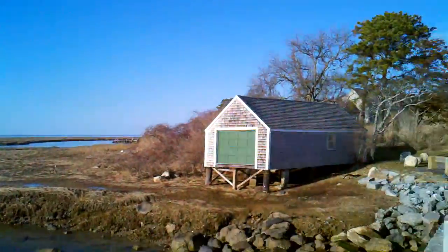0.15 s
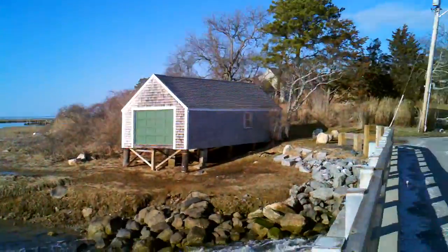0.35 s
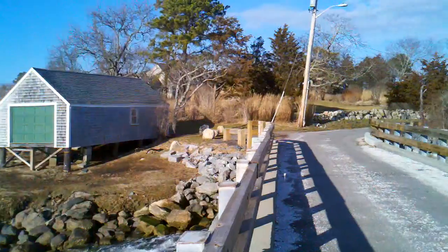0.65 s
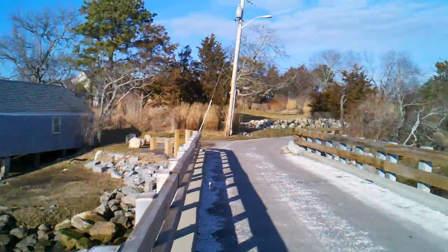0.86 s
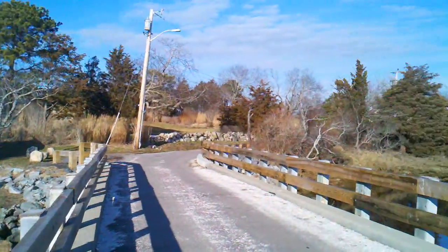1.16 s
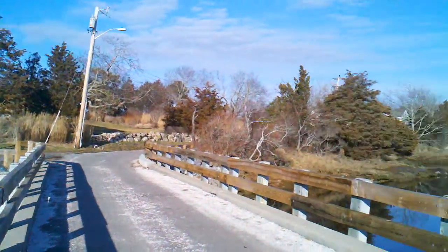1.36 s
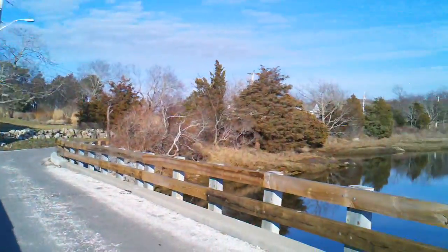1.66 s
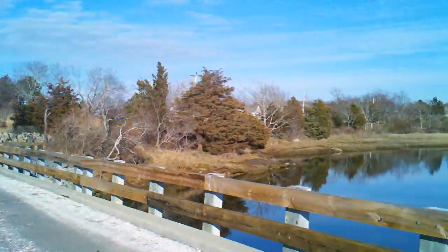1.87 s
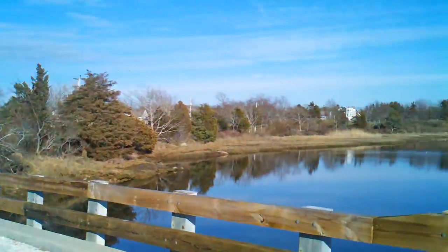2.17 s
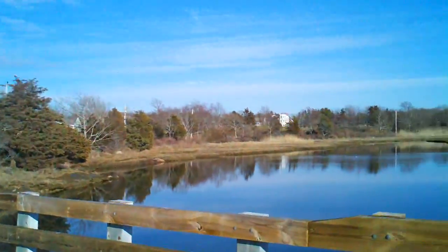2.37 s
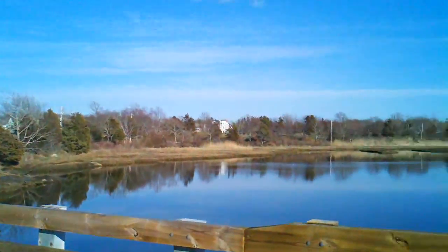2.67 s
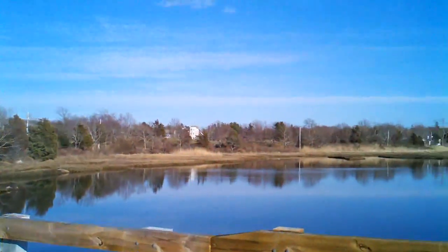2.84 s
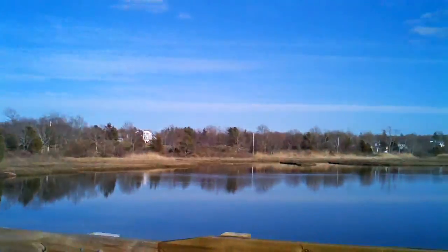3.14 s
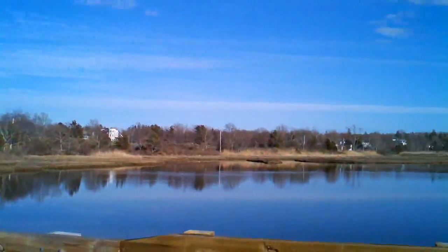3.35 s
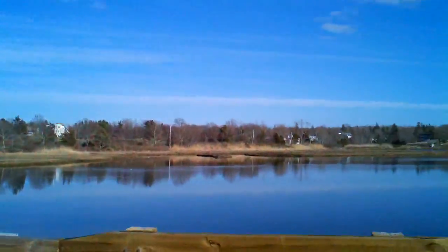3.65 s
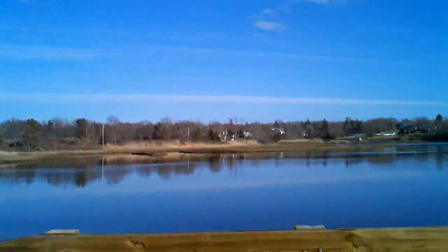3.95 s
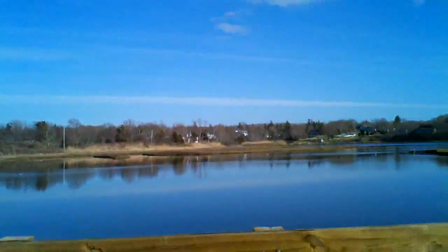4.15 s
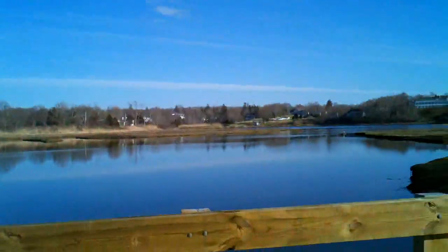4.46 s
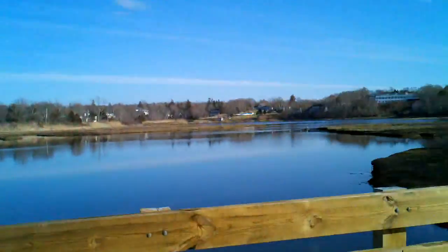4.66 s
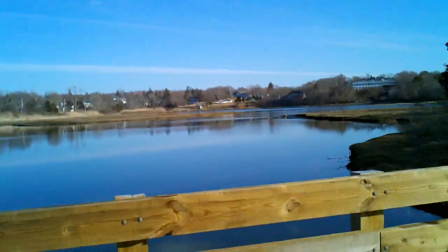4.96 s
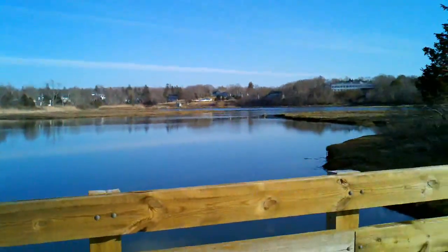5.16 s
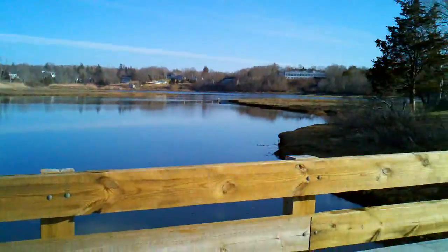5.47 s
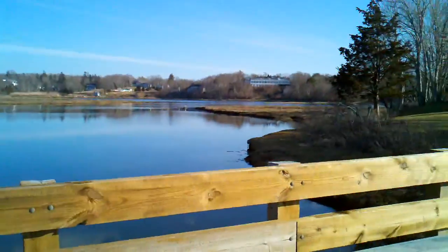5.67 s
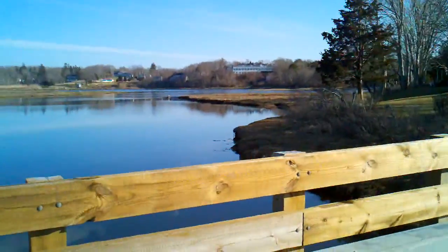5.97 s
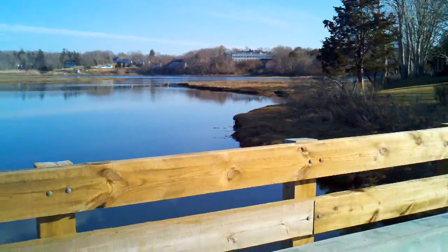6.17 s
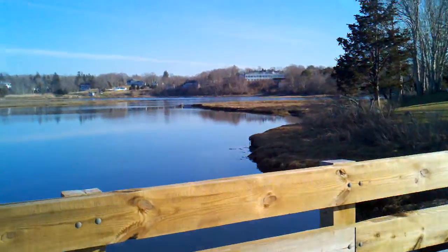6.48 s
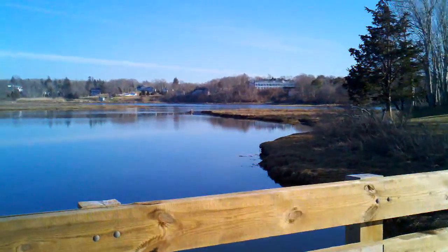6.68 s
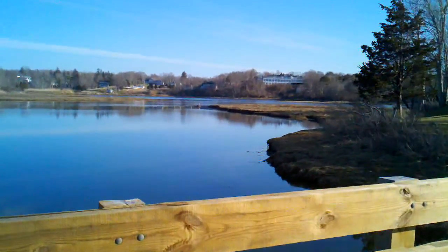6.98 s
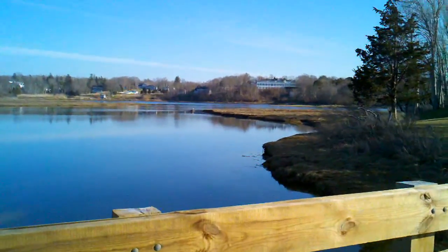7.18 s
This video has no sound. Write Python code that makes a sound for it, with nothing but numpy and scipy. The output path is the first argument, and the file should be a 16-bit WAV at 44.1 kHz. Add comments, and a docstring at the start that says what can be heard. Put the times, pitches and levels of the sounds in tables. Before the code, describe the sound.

A steady rush of gurgling, splashing creek water slowly loses its bright spray and weakens, with a few handling clicks and rubs near the end.

```python
"""Tidal water rushes through a rocky channel under a bridge, heard from the deck on a hand-held phone.
From the start bubbles merge into a roar with fizzing spray; near ones gurgle, heaves free bubble clouds.
Short low swells, most of them gulping air pockets, come from 0.66 s on; from 1.2 s fingers tick and rub
on the case, most densely near the end. Meanwhile the phone swings away from the channel, fast at first,
and the roar and spray fade. Stereo is widened by subtracting from each port the delayed other."""
import sys
import numpy as np
from scipy import signal
from scipy.fft import rfft, irfft, next_fast_len
from scipy.io import wavfile
from scipy.ndimage import map_coordinates

SR = 44100
rng = np.random.default_rng(int(sys.argv[2]) if len(sys.argv) > 2 else 0)


def store_wav(level_fs):
    """Save 16-bit WAV to argv[1]."""
    pcm = np.round(np.clip(np.atleast_2d(level_fs), -1, 1) * 32767)
    wavfile.write(sys.argv[1], SR, pcm.T.astype(np.int16))


N = 322812
TIME = np.arange(N) / SR
PADDED = next_fast_len(N + 8192)
HZ = np.maximum(np.arange(PADDED // 2 + 1) * SR / PADDED, 1)


def from_db(db):
    """Decibels to gain."""
    return 10 ** (np.asarray(db) / 20)


def rms_one(x):
    """Scale to rms 1."""
    return x / np.sqrt(np.mean(x ** 2) + 1e-20)


def in_time(rows):
    """One curve per column, joined by straight lines."""
    s, *columns = np.transpose(rows)
    return [np.interp(TIME, s, column) for column in columns]


def over_hz(points):
    """A table read along a log-frequency axis."""
    hz, values = np.transpose(points)
    return np.interp(np.log(HZ), np.log(hz), values)


def filtered(x, response):
    """Apply a frequency response."""
    return irfft(rfft(x, PADDED) * response, PADDED)[..., :N]


def butter(x, order, cut_hz, kind="low"):
    """Apply a Butterworth filter."""
    return signal.sosfilt(signal.butter(order, cut_hz, kind, fs=SR, output="sos"), x)


def delayed(x, delay_ms):
    """Read a sound late by a changing delay."""
    return map_coordinates(x, [np.arange(N) - delay_ms * SR / 1000], order=3)


def drift(rate_hz):
    """Smooth chance with spread 1 that changes about rate_hz times a second."""
    r = np.exp(-80 * np.pi * rate_hz / SR)
    noise = rng.standard_normal(N // 40 + 2002)
    slow = signal.lfilter([1], [1, -2 * r, r * r], noise)[2000:]
    return np.interp(np.arange(N) / 40, np.arange(len(slow)), rms_one(slow))


def stroke(start_s, length_s):
    """A smooth rise and fall, 0-1."""
    return np.sin(np.pi * np.clip((TIME - start_s) / length_s, 0, 1))


def ring(drive, pitch_hz, t60_s):
    """A damped two-pole mode: a unit click sets a sine of height 1 ringing."""
    r = from_db(-60 / (t60_s * SR))
    w = 2 * np.pi * pitch_hz / SR
    return signal.lfilter([0, np.sin(w)], [1, -2 * r * np.cos(w), r * r], drive + 1e-18)


def chirp(age_s, pitch_hz, rise_per_s):
    """A sine whose pitch climbs by a fixed fraction of pitch_hz a second."""
    return np.sin(2 * np.pi * pitch_hz * age_s * (1 + rise_per_s * age_s / 2))


def resonant_noise(pitch_hz, width_hz):
    """Noise in one steep-sided resonance; rms 1."""
    response = 1 / (1 + ((HZ - pitch_hz ** 2 / HZ) / width_hz) ** 2)
    return rms_one(filtered(rng.standard_normal(N), response))


# turn of the phone: time_s, bearing_deg
TURN = [(0, 27.5), (1, 67.4), (2.3, 122), (3, 130), (4, 145), (5, 149.8), (6.1, 159), (7.3, 158)]


def bearing():
    """Angle between the phone's line of sight and the channel, in radians."""
    return np.radians(in_time(TURN)[0])


def facing():
    """How squarely the phone faces the channel, 0-1."""
    return ((1 + np.cos(bearing())) / 2) ** 2


# rushing water, used relative to its mean: time_s, level_db
RUSH_LEVEL = [(0.05, -26), (1.19, -26), (3.33, -26), (6.16, -28.5), (7.09, -33), (7.15, -33)]
# treble, which the deck shades sooner, used relative to its mean: time_s, level_db
SPRAY_LEVEL = [(0.05, -35.5), (0.5, -35.5), (1.0, -34.5), (1.7, -35.5), (2.2, -36), (2.65, -37),
               (2.95, -35.5), (4.06, -37.5), (4.62, -41.5), (5.1, -43.5), (5.6, -44.5), (6.1, -48.5),
               (6.4, -48.5), (6.7, -47.5), (7.3, -45.5)]
# bursts of spray: start_s, length_s, rise_db
SPLASHES = [(0.16, 0.12, 1.5), (0.84, 0.06, 1), (2.81, 0.13, 1), (3.11, 0.093, 1.5), (4.07, 0.07, 1.8),
            (4.35, 0.1, 0.5), (5.14, 0.08, 0)]


def zone_levels(roar_db=-1.5, gurgle_db=-0.7, splash_db=-1.8, spray_db=-1.76,
                facing_roar_db=-1.9, facing_gurgle_db=-6.0, facing_splash_db=4.5,
                roar_follows=0.61, gurgle_follows=1.2, splash_follows=1.38):
    """Zone levels in dB; facing the channel brings more splash and less of the low churning."""
    (rush,), (treble,) = in_time(RUSH_LEVEL), in_time(SPRAY_LEVEL)
    rush, treble = rush - rush.mean(), treble - treble.mean()
    front = facing()
    bursts = sum(db * stroke(s, length) for s, length, db in SPLASHES)
    return (roar_db + roar_follows * rush + facing_roar_db * front,
            gurgle_db + gurgle_follows * rush + facing_gurgle_db * front,
            splash_db + splash_follows * rush + facing_splash_db * front,
            spray_db + treble + bursts)


def bubbles(per_s, cycles, spread_db, count=64):
    """Bubbles of all sizes ring for some cycles each, small ones more often; even power per Hz."""
    out = np.zeros(N)
    for hz in np.geomspace(120, 15000, count):
        births = int(per_s * (.5 + hz / 1000) * N / SR)
        when, size, sign = rng.random((births, 3)).T
        sizes = from_db(spread_db * np.minimum(-np.log(size), 4)) * np.sign(sign - .5)
        clicks = np.bincount((when * N).astype(int), sizes, N)
        out += np.sqrt(hz) * rms_one(ring(clicks, hz, cycles / hz))
    return rms_one(out)


# colour of the water before zone levels: pitch_hz, density_db (per Hz)
WATER = [(110, -73.5), (155, -67), (250, -57.5), (420, -53), (700, -55.5), (1250, -61.5), (1900, -61.5),
         (2900, -67.5), (3750, -71.5), (4500, -76), (5200, -79), (6500, -73), (9000, -72.5), (11500, -78.5),
         (14000, -80)]


def white_water(bubble_share=0.61, surge_db=1.03, spatter_db=1.1):
    """One stretch of rapids: near bubbles over the blur of far ones, surging in four zones of pitch."""
    share = np.clip(bubble_share, 0, 1)
    near = bubbles(per_s=70, cycles=30.2, spread_db=2.5)
    far = rng.standard_normal(N)
    churn = np.sqrt(share) * near + np.sqrt(1 - share) * far
    colour = from_db(over_hz(WATER)) * np.sqrt(SR / 2) * np.minimum(HZ / WATER[0][0], 1) ** 5
    roar = over_hz([(430, 0.75), (620, 0.017)])
    up_to_gurgle = over_hz([(820, 0.77), (1100, 0.052)])
    spray = over_hz([(2000, 0.17), (3200, 0.86)])
    roar_db, gurgle_db, splash_db, spray_db = zone_levels()
    zones = [(roar, roar_db + surge_db * drift(4.3)),
             (up_to_gurgle - roar, gurgle_db + surge_db * drift(17)),
             (1 - up_to_gurgle - spray, splash_db + surge_db * drift(8.3)),
             (spray, spray_db + spatter_db * drift(14.6))]
    return sum(filtered(churn, colour * zone) * from_db(db) for zone, db in zones)


# heaves of the water: start_s, length_s, level_db, pitch_hz, spread_hz
SURGES = [(0.0, 0.2, -30, 1110, 130), (0.204, 0.13, -30, 700, 150), (0.41, 0.098, -31, 640, 110),
          (0.528, 0.1, -32.5, 700, 70), (1.2, 0.13, -32.5, 250, 70), (1.5, 0.24, -28, 780, 151),
          (1.997, 0.057, -22, 920, 201), (2.18, 0.18, -27.5, 385, 70.5), (2.873, 0.097, -30, 523, 90),
          (3.19, 0.062, -25.5, 410, 90), (4.28, 0.071, -32, 1080, 90), (5.038, 0.059, -32, 980, 150)]


def surges():
    """A heave of water frees a cloud of bubbles of about one size: a swell of resonant noise."""
    out = np.zeros(N)
    for start_s, length_s, level_db, pitch_hz, spread_hz in SURGES:
        out += from_db(level_db) * stroke(start_s, length_s) * resonant_noise(pitch_hz, spread_hz)
    return out


def gurgles(per_s=22, low_hz=330, high_hz=1700, size_db=-31, spread_db=2.5, cycles=8.7, rise_per_s=6.93):
    """Single bubbles close by: each swells, rings for some cycles and chirps upward."""
    out = np.zeros(N + SR)
    age_s = np.arange(SR // 8) / SR
    for when, pitch, size in rng.random((int(per_s * N / SR), 3)):
        hz = low_hz * (high_hz / low_hz) ** pitch
        start = int(when * N)
        life = age_s * hz / cycles
        gain = from_db(size_db + spread_db * min(-np.log(size), 3))
        swell = 2 * (np.exp(-life) - np.exp(-5 * life))
        out[start:start + len(age_s)] += gain * swell * chirp(age_s, hz, rise_per_s)
    return out[:N] * from_db(zone_levels()[1])


def hollow(pitch_hz=643, width_hz=270, facing_db=-29):
    """The hollow between the rocks rings with the roar, heard when facing it."""
    return from_db(facing_db) * np.sqrt(facing()) * resonant_noise(pitch_hz, width_hz)


# bright band of the rush: time_s, pitch_hz, level_db
BRIGHT_BAND = [(0, 1900, -42), (0.45, 1938, -39), (1.15, 2157, -29.5), (1.5, 1860, -42), (1.95, 1597, -38),
               (2.7, 1553, -48), (3.2, 1550, -75)]


def bright_band(width_hz=210, left_db=-10):
    """Low noise shifted up to a gliding pitch: a narrow band of the rush, mostly at the right port."""
    hz, level_db = in_time(BRIGHT_BAND)
    phase = 2 * np.pi * np.cumsum(hz) / SR
    a, b = filtered(rng.standard_normal((2, N)), 1 / (1 + (HZ / width_hz) ** 4))
    band = rms_one(a * np.cos(phase) + b * np.sin(phase))
    return from_db(level_db) * band * from_db([[left_db], [0]])


def paths(side_on_lead_ms=0.41, clearest_share=0.83, clearest_deg=107, opening_deg=79,
          bounce_ms=0.93, bounce_swing_ms=0.48):
    """The turn sets the left port's lead (ms), the straight share (0-1) and the bounce delay (ms)."""
    angle = bearing()
    share = clearest_share * np.exp(-((np.degrees(angle) - clearest_deg) / opening_deg) ** 2)
    return side_on_lead_ms * np.sin(angle), share, bounce_ms + bounce_swing_ms * np.cos(angle)


def railing_bounce(ports, delay_ms, bounce=0.023, facing_bounce=0.22, cut_hz=1300):
    """A dulled echo off the railing; a dip in the roar glides up as its delay shortens."""
    echo = butter(ports, 1, cut_hz)
    return (bounce + facing_bounce * facing()) * np.array([delayed(side, delay_ms) for side in echo])


# the deck lets little treble come straight: pitch_hz, weight (0-1)
STRAIGHT = [(80, 0.1), (160, 0.87), (400, 0.96), (750, 0.98), (1300, 0.89), (2000, 0.7), (3500, 0.85),
            (6000, 0.12), (13000, 0)]
# scattered sound is alike at both ports only in the bass: pitch_hz, correlation
LIKENESS = [(250, 1), (550, 0.98), (900, 1), (1400, 0.0)]


def channel():
    """Water comes straight from the channel, scattered by the rocks from all round, and off the railing."""
    lead_ms, share, bounce_ms = paths()
    share = np.clip(share, 0, .95)
    weight = np.clip(over_hz(STRAIGHT), 0, 1)
    near = filtered(white_water(), np.sqrt(weight)) * np.sqrt(share) + surges() + gurgles()
    alike = np.clip(over_hz(LIKENESS), -1, 1)
    common = filtered(white_water(), np.sqrt((1 + alike) / 2))
    opposed = filtered(white_water(), np.sqrt((1 - alike) / 2))
    around = common + opposed * [[1], [-1]]
    around = around - filtered(around, weight) * (1 - np.sqrt(1 - share))
    ports = np.array([near, delayed(near, lead_ms)]) + around + hollow() + bright_band()
    return ports + railing_bounce(ports, bounce_ms)


# the microphones' own noise: pitch_hz, gain_db
RUMBLE = [(25, -59), (60, -47), (120, -39.5), (400, -65)]


def rumble():
    """The microphones' own faint low noise, independent at each port."""
    return filtered(rng.standard_normal((2, N)), from_db(over_hz(RUMBLE)))


# short swells; those at 2.25 and 2.305 s are churning water, the others air pockets:
# start_s, level_db, pitch_hz (at the start)
SHORT_SWELLS = [(0.66, -23, 203), (0.797, -27, 332), (1.14, -25, 776), (1.57, -26, 352), (2.02, -21, 340),
                (2.25, -24.5, 334), (2.305, -23.5, 375), (4.022, -26, 772), (5.68, -26, 790),
                (6.013, -20, 252), (6.29, -25, 580)]


def short_swells(swell_s=0.0094, rise_per_s=5.1):
    """Short low swells of the water: each is a sine that rises fast, dies away and climbs a little in pitch."""
    out = np.zeros(N)
    for start_s, level_db, pitch_hz in SHORT_SWELLS:
        age_s = np.maximum(TIME - start_s, 0)
        swell = (age_s / swell_s * np.exp(1 - age_s / swell_s)) ** 2
        out += from_db(level_db) * swell * chirp(age_s, pitch_hz, rise_per_s)
    return np.array([out, out])


UPPER_RING_HZ, TOP_RING_HZ = 3560, 7800   # a fingernail wakes the top ring
HELD_T60_S = 0.003   # where a finger presses on the case
# ticks of the case, before case filters and port gains; upper and top relative to level_db, t60_s longer
# where the fingers damp it less: start_s, level_db, pitch_hz, upper_db, top_db, t60_s
TICKS = [(1.2344, -5.5, 1610, -33, -35, 0.0051), (2.3727, -0.2, 1520, -42, -40, 0.0043),
         (4.8283, -6, 1500, -32, -35, 0.004), (4.858, -17, 1700, -28, -35, 0.006),
         (6.4415, -15, 1400, -24, -30, 0.008), (6.447, -17.5, 1500, -24, -30, 0.008),
         (6.492, -12, 1400, -24, -30, 0.006), (6.6077, -10, 1300, -15, -24, 0.0047),
         (6.6503, -16, 1640, -29, -30, 0.006), (6.875, -14.5, 1650, -23, -30, 0.0074),
         (7.0355, -22, 2150, -18, -4, 0.008), (7.086, -16.5, 2140, -16, -7, 0.01),
         (7.192, -18, 1700, -3, -15, 0.006), (7.208, -19, 1300, -22, -30, 0.008),
         (7.2134, -9.5, 1420, -23, -25, 0.0079), (7.222, -9.3, 1810, -15, -18, 0.0047),
         (7.263, -18, 1800, -3, -15, 0.006)]


def ticks(body_hz=930, body_db=-13):
    """Clicks ring the dead modes of the case over a low knock; returns the rings and the top ring."""
    rings, top = np.zeros((2, N))
    for start_s, level_db, pitch_hz, upper_db, top_db, t60_s in TICKS:
        click = np.zeros(N)
        click[round(start_s * SR)] = from_db(level_db)
        rings += ring(click, pitch_hz, t60_s) + from_db(upper_db) * ring(click, UPPER_RING_HZ, t60_s)
        rings -= from_db(body_db) * ring(click, body_hz, HELD_T60_S)
        top += from_db(top_db) * ring(click, TOP_RING_HZ, t60_s / 2)
    return rings, top


# fingers sliding, before case filters and port gains; upper_db relative to ring_db:
# start_s, length_s, ring_db, upper_db, hiss_db
RUBS = [(1.215, 0.05, -33, -18, -55), (4.8, 0.13, -32, -16, -50), (5.69, 0.18, -41, -3, -39),
        (5.825, 0.03, -47, -6, -39), (6.426, 0.042, -33, -18, -58), (6.478, 0.053, -38, -18, -40),
        (6.56, 0.14, -41, -14, -47), (7.171, 0.13, -34.5, -9, -38.5)]


def rubs(rub_hz=1500, slips_per_s=1500, slip_spread_db=3.0):
    """Dense uneven slips ring the case while sliding skin hisses; returns the rings and the hiss."""
    rings, hiss = np.zeros((2, N))
    slips = (rng.random(N) < slips_per_s / SR) * rng.choice([-1, 1], N)
    slips = slips * from_db(slip_spread_db * np.minimum(rng.exponential(1, N), 4))
    main = rms_one(ring(slips, rub_hz, HELD_T60_S))
    upper = rms_one(ring(slips, UPPER_RING_HZ, HELD_T60_S))
    skin = rng.standard_normal(N)
    for start_s, length_s, ring_db, upper_db, hiss_db in RUBS:
        slide = stroke(start_s, length_s)
        rings += from_db(ring_db) * slide * (main + from_db(upper_db) * upper)
        hiss += from_db(hiss_db) * slide * skin
    return rings, hiss


def fingers(fingertip_cut_hz=4800, hiss_cut_hz=9500):
    """Ticks and rubs on the case beside the right port; soft fingertips dull the rings."""
    (tick_rings, top), (rub_rings, hiss) = ticks(), rubs()
    out = butter(tick_rings + rub_rings, 4, fingertip_cut_hz) + butter(top + hiss, 2, hiss_cut_hz)
    out = butter(out, 2, 600, "high")   # a small case gives no bass
    return out * [[.2], [1.4]]


# the ports' unequal colour: pitch_hz, right_over_left_db
PORT_MISMATCH = [(300, -1.5), (1200, -4.5), (1850, 3.5), (2600, -2), (3300, -5), (4200, 0.5)]


def scene():
    """Water through the unequal ports, plus fingers and rumble."""
    mismatch = from_db(over_hz(PORT_MISMATCH) * np.array([[-.5], [.5]]))
    mismatch = mismatch / np.sqrt(np.mean(mismatch ** 2, axis=0))
    return filtered(channel() + short_swells(), mismatch) + fingers() + rumble()


PORT_GAP_S, CUTOFF_HZ = .000383, 13980
# a hollow in the centre near 2.6 kHz, narrow early, wide later
NOTCH_HZ, NOTCH_EARLY_WIDTH_HZ, NOTCH_LATE_WIDTH_HZ = 2612, 100, 393
# widening: pitch_hz, subtracted_share of the other port
CROSSFEED = [(30, 0.82), (140, 0.76), (500, 0.83), (950, 1), (4100, 1), (4700, 0.18), (13000, 0.14)]


def record(dry):
    """Each side loses the delayed other, the centre is notched; lost bass is made up, the top is cut."""
    cross = np.clip(over_hz(CROSSFEED), 0, 1)
    turn = 2 * np.pi * HZ * PORT_GAP_S
    # what is left of sound from all round
    power = 1 + cross ** 2 - 2 * cross * np.sinc(turn / np.pi) * np.cos(turn)
    make_up = 1 / np.sqrt(power + .01)
    steep_cut = 1 / np.sqrt(1 + (HZ / CUTOFF_HZ) ** 900)
    centre = dry.mean(axis=0)
    narrow, wide = (filtered(centre, 1 / (1 + (2 * (HZ - NOTCH_HZ) / width_hz) ** 8))
                    for width_hz in (NOTCH_EARLY_WIDTH_HZ, NOTCH_LATE_WIDTH_HZ))
    ports = dry - wide - np.sqrt(facing()) * (narrow - wide)
    tone = make_up * steep_cut
    return filtered(ports, tone) - filtered(ports[::-1], tone * cross * np.exp(-1j * turn))


dry = scene()
out = record(dry)
store_wav(out)
```